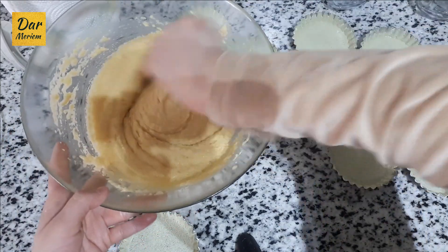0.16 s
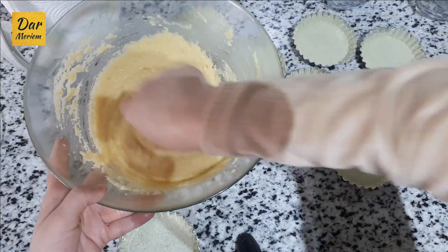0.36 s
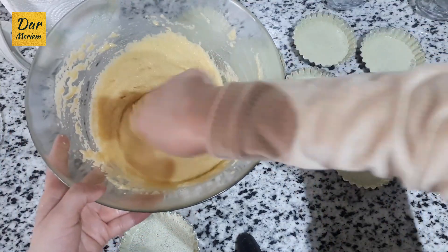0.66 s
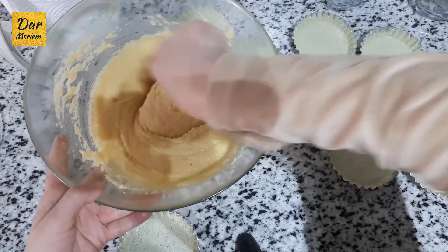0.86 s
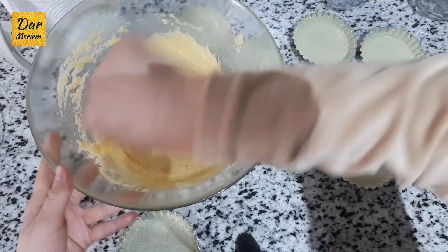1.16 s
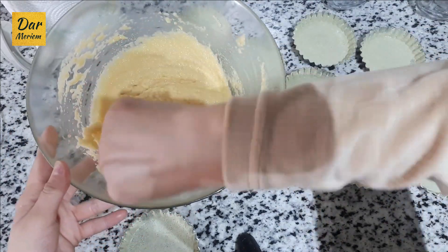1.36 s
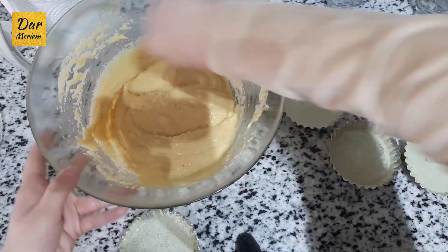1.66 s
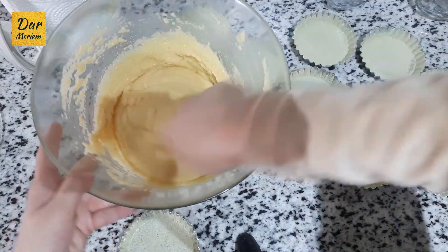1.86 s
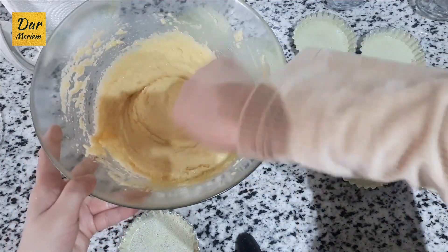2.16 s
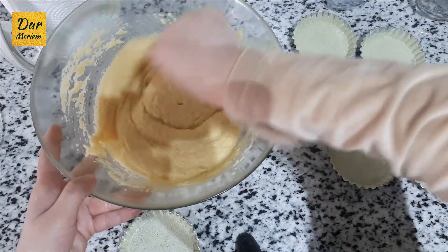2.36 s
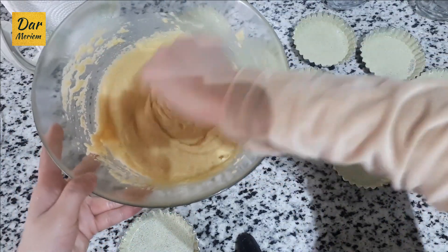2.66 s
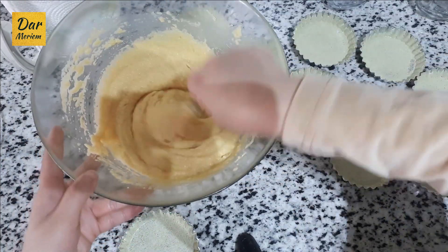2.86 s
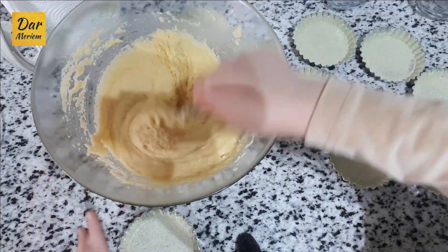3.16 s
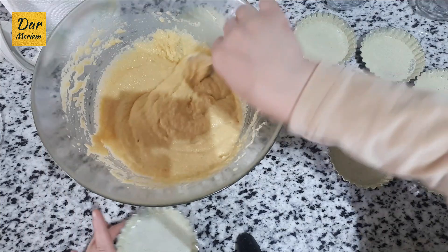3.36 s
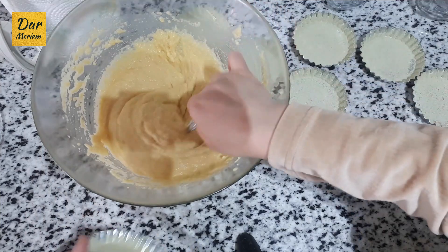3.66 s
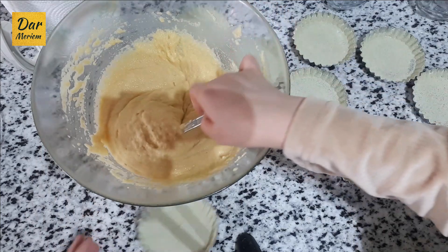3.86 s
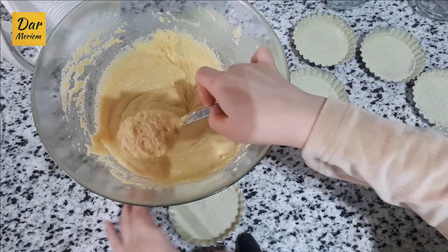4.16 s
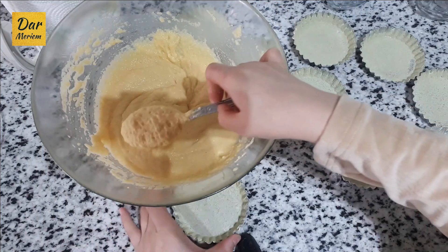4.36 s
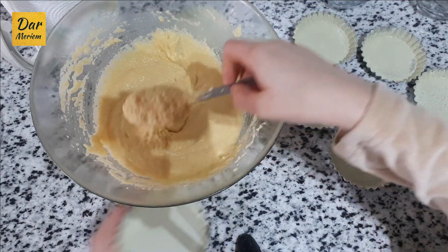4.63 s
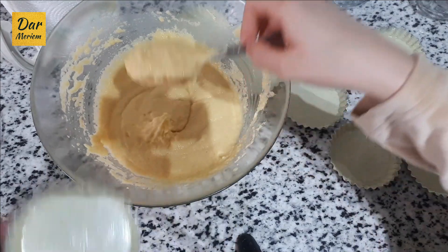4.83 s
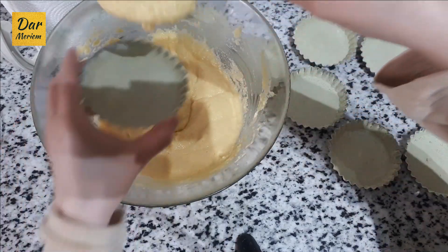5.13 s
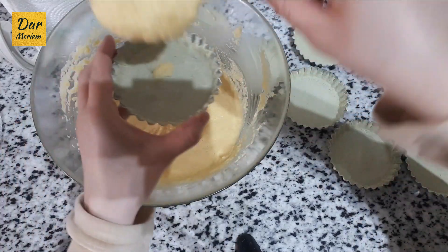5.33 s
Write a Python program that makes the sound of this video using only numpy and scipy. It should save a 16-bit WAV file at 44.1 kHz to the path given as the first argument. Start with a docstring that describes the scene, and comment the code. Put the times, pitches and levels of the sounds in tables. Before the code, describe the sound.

Two microphones above the bowl, leaning left, catch wet batter strokes with bursting bubbles, rustle and low glassy resonance. The stirring thins out by three seconds, faint metallic ticks follow, then a small tin scrapes in several quick rough strokes on stone with clear metal ring and a dull landing thud. Quiet sticky rustling closes it, over faint room air and short diffuse kitchen echoes.

```python
"""A spoon stirs thick batter in a glass bowl: grains of crackle ring around moving pitches as squelch
and rustle, swelling tones and short snaps are bursting air pockets, rising tones are gulps.
Then a small fluted metal tin is touched, dragged to and fro on the stone counter and lifted: clicks and
stone grain drive its modes. Two microphone ports hang above the bowl, the left one nearer.
The hard-walled kitchen answers bowl and tin with diffuse echoes, over a faint steady air noise."""
import sys
import numpy as np
from scipy import signal
from scipy.fft import rfft, irfft
from scipy.io import wavfile
from scipy.ndimage import uniform_filter1d, map_coordinates

SR = 44100
rng = np.random.default_rng(int(sys.argv[2]) if len(sys.argv) > 2 else 0)


def file_out(sig):
    """Save sig as 16-bit WAV at sys.argv[1]."""
    # one column per channel
    cols = np.atleast_2d(sig).T
    # limit, then scale
    lim = np.clip(cols, -1, 1)
    pcm = np.round(lim * 32767).astype(np.int16)
    wavfile.write(sys.argv[1], SR, pcm)


N = 242285


def from_db(db):
    """Decibels to amplitude."""
    return 10 ** (np.asarray(db) / 20)


def rms_one(x):
    """Scale to an rms of 1."""
    return x / np.sqrt(np.mean(x ** 2) + 1e-20)


def in_time(rows):
    """Columns of a table as curves, one value a sample."""
    s, *columns = np.transpose(rows)
    return [np.interp(np.arange(N) / SR, s, c) for c in columns]


def at_hz(points, hz):
    """Read a curve of (Hz, value) points, straight over log frequency."""
    points_hz, values = np.array(points).T
    return np.interp(np.log(np.maximum(hz, 1)), np.log(points_hz), values)


def colour(x, spectrum):
    """Causal (minimum-phase) filter with the given dB spectrum."""
    log_gain = np.log(from_db(at_hz(spectrum, np.fft.rfftfreq(2048, 1 / SR))))
    cepstrum = irfft(log_gain)
    cepstrum[1:1024] *= 2
    cepstrum[1025:] = 0
    kernel = irfft(np.exp(rfft(cepstrum)))[:1024]
    filtered = signal.fftconvolve(np.atleast_2d(x), kernel[None], axes=1)
    return filtered[:, :N].reshape(np.shape(x))


def resonate(x, hz, width_hz):
    """Two-pole resonance of gain 1 on top."""
    r = np.exp(-np.pi * width_hz / SR)
    poles = [1, -2 * r * np.cos(2 * np.pi * hz / SR), r * r]
    return signal.lfilter([(1 - r * r) / 2, 0, (r * r - 1) / 2], poles, x)


def grains(per_s, spread_db):
    """Random clicks of uneven size and either sign, rms 1."""
    sizes = from_db(spread_db * np.minimum(rng.exponential(1, N), 4)) * rng.choice([-1, 1], N)
    return rms_one(sizes * (rng.random(N) < per_s / SR))


def around(centre_hz, pitches, spread, sharpness, per_s):
    """Grains ring in a row of resonances; those near the moving centre speak most. Level evened to 1."""
    rung = 0
    for hz in pitches:
        nearness = np.exp(-(np.log(hz / centre_hz) / spread) ** 2) + 0.05
        rung = rung + nearness * resonate(grains(per_s, spread_db=7.0), hz, hz / sharpness)
    return rung / np.sqrt(uniform_filter1d(rung ** 2, size=8000))


def swells(s, peak_db, rise, fall):
    """Sum of gains that climb to each peak and sink from it at steady dB a second."""
    t = np.arange(N) / SR
    rows = np.broadcast(s, peak_db, rise, fall)
    return sum(from_db(db + np.minimum(up * (t - at), down * (at - t))) for at, db, up, down in rows)


def ports(x, balance, lag_s):
    """One source (or one signal a port) as the two ports hear it: the balance in dB, the right one late."""
    left, right = np.broadcast_to(x, (2, N))
    half = np.array(balance) * [1, .5]
    late = map_coordinates(right, [np.arange(N) - lag_s * SR], order=3, mode="nearest")
    return np.array([colour(left, half), colour(late, half * [1, -1])])


# Tone of the room's air. Each row: frequency in Hz, gain in dB.
AIR_SPECTRUM = [(12, -42.5), (20, -12.5), (131, 5.5), (237, -23), (566, -8), (794, -21), (1110, -17.5),
                (1470, -23), (3140, -27), (3940, -25.5), (7730, -41.5), (15200, -36), (16500, -43)]
# How alike the air sounds at both ports. Each row: frequency in Hz, left-right likeness (1 is the same).
AIR_LIKENESS = [(40, 0.3), (200, 0.93), (700, 0.64), (2000, .5), (6000, .1)]
# How much nearer the left port is, for the bowl and the air. Each row: frequency in Hz, left minus right in dB.
BOWL_BALANCE = [(40, -1.5), (130, 7), (700, 8), (2500, 8), (5000, 5), (12000, 2.5)]


def air(mid_db=-62):
    """Faint steady noise of the room, alike in both ports in the bass."""
    mid, side = colour(rng.standard_normal((2, N)), AIR_SPECTRUM)
    unlike = []
    for hz, likeness in AIR_LIKENESS:
        likeness = np.clip(likeness, 0, .99)
        unlike.append((hz, 10 * np.log10((1 - likeness) / (1 + likeness))))
    side = colour(side, unlike)
    return from_db(mid_db) / np.std(mid) * ports(np.array([mid + side, mid - side]), BOWL_BALANCE, 0)


# The bowl's glass, damped by batter. Each row: mode in Hz, width in Hz, gain in dB re the sound inside.
BOWL = [(295, 23, 14.5), (577, 29, 5.5), (670, 19, -21)]


def glass(x):
    """The bowl rings on under whatever happens in it."""
    return x + sum(from_db(db) * resonate(x, hz, width_hz) for hz, width_hz, db in BOWL)


# Strokes of the spoon. Each row: time in seconds, squelch in dB, rustle in dB.
STIR = [(0.0, -38.5, -48), (0.08, -63.5, -64.5), (0.24, -59.5, -57.5), (0.32, -45.5, -58),
        (0.48, -59.5, -59), (0.78, -47.5, -56), (0.89, -56.5, -60), (1.0, -68.5, -126), (1.22, -76, -66),
        (1.33, -76, -64.5), (1.45, -79, -67.5), (1.57, -76, -63), (1.72, -73, -80), (1.81, -49.5, -52),
        (1.95, -51, -55.5), (2.09, -60, -64), (2.21, -48, -44.5), (2.3, -44.5, -86), (2.38, -65.5, -43.5),
        (2.5, -48, -59), (2.67, -59.5, -68), (2.9, -69.5, -73), (3.1, -61.5, -52), (3.19, -66, -61),
        (3.3, -65, -55), (3.42, -68, -56.5), (3.67, -80.5, -69.5)]
# Spoon and tin are lifted. Each row: time in seconds, squelch in dB, rustle in dB.
LIFT = [(4.5, -68, -78), (4.6, -87, -68), (4.669, -65, -63.5), (4.789, -61, -63.5), (4.92, -75, -65.5),
        (5.0, -60.5, -52.5), (5.11, -82, -72.5), (5.19, -91, -66), (5.33, -81.5, -77), (5.49, -100, -84)]
# Where the rustle is brightest. Each row: time in seconds, frequency in Hz.
RUSTLE_PITCH = [(0, 2860), (0.8, 3620), (1.0, 2850), (1.3, 4360), (1.8, 2500), (2.3, 3520), (2.6, 2800),
                (2.75, 4630), (3.1, 2750), (3.2, 4600), (3.45, 2130), (4.6, 2200), (4.68, 3940),
                (4.78, 2730), (4.92, 4065), (5.0, 2590), (5.1, 2100), (5.2, 3820), (5.49, 3375)]
# Tone of the rustle. Each row: frequency in Hz, filter gain in dB.
RUSTLE = [(800, -30), (1500, 4.5), (2300, -11), (4500, 0), (6300, -4.5), (7300, -30.5), (9000, -57.5)]
# Finest treble, of hiss, fizz and fine grit. Each row: frequency in Hz, filter gain in dB.
TOP = [(6000, -42), (8800, -19.5), (10500, -8.5), (12500, -5), (15000, -8), (16500, -10)]

SQUELCH_HZ, SQUELCH_DB_PER_OCTAVE = 694, 33   # pitch at -60 dB; a harder stroke squelches higher
HISS_DB, HISS_FOLLOWS = -78, 0.45   # fine treble hiss at a rustle of -60 dB; share of its swing
RUMBLE_DB, RUMBLE_FOLLOWS = -64, .6   # rumble at a squelch of -60 dB; share of its swing


def stirring():
    """Tiny pockets crackle around a moving pitch; batter rustles under a fine treble hiss; the bowl rumbles."""
    rests = [[3.7, -95, -90], [4.4, -95, -90]]
    squelch_db, rustle_db = in_time(np.concatenate([STIR, rests, LIFT]))
    squelch_hz = np.clip(SQUELCH_HZ * 2 ** ((squelch_db + 60) / SQUELCH_DB_PER_OCTAVE), 480, 1200)
    squelch = around(squelch_hz, np.geomspace(350, 1500, 12), spread=0.59, sharpness=10.0, per_s=300)
    rustle_hz, = in_time(RUSTLE_PITCH)
    rustle = around(rustle_hz, np.geomspace(1500, 6500, 12), spread=.38, sharpness=8, per_s=1100)
    rustle = colour(rustle, RUSTLE)
    hiss = rms_one(colour(rng.standard_normal((2, N)), TOP))
    rumble = rng.standard_normal(N)   # the bowl on the stone
    rumble = rms_one(resonate(rumble, 170, width_hz=51) + 0.49 * resonate(rumble, 250, width_hz=33))
    hiss_db = HISS_DB + HISS_FOLLOWS * (rustle_db + 60)
    rumble_db = RUMBLE_DB + RUMBLE_FOLLOWS * (squelch_db + 60)
    return (glass(from_db(squelch_db) * squelch) + from_db(rustle_db) * rustle
            + from_db(hiss_db) * hiss + from_db(rumble_db) * rumble)


# How long the kitchen rings. Each row: frequency in Hz, seconds to die by 60 dB.
ROOM_T60 = [(100, 0.28), (260, 0.43), (700, 0.26), (1840, 0.31), (4850, 0.28), (12800, 0.23)]
# How alike the echoes are at both ports. Each row: frequency in Hz, left-right likeness (1 is the same).
ECHO_LIKENESS = [(80, 0.56), (300, 0.62), (800, 0.22), (1500, 0.097), (5000, 0.017)]


def kitchen(x, first_s=0.0015):
    """Diffuse echoes dying band by band, alike in both ports in the bass, unlike in the treble."""
    t = np.arange(round(.6 * SR)) / SR
    edges = 60 * 2 ** np.arange(0, 8.6, .5)   # half-octave bands
    white = rng.standard_normal((2, 2, len(t)))   # neighbouring bands take turns
    tail = 0
    for k, (low, high) in enumerate(zip(edges, edges[1:])):
        band = signal.butter(2, [low, high], "band", fs=SR, output="sos")
        mid, side = signal.sosfilt(band, white[k % 2])
        hz = np.sqrt(low * high)
        alike = np.clip(at_hz(ECHO_LIKENESS, hz), -1, 1)
        pair = np.sqrt(1 + alike) * mid + np.sqrt(1 - alike) * side * [[1], [-1]]
        tail = tail + pair * from_db(-60 * t / at_hz(ROOM_T60, hz))
    tail = tail * np.clip(t / first_s - .5, 0, 1)
    tail = tail / np.sqrt(np.sum(tail ** 2, axis=1, keepdims=True))
    return signal.fftconvolve(x, tail, axes=1)[:, :N]


# Air pockets bursting. Each row: start in seconds, pop level in dB, pocket pitch in Hz,
# snap in dB re the pop, snap pitch in Hz, fizz in dB re the pop.
POPS = [(0.003, -29, 910, -6.5, 3030, -11), (0.146, -52.5, 600, 12.5, 3230, -22),
        (0.243, -44, 590, -5, 2790, -31), (0.295, -48, 640, 5.5, 2780, -31),
        (0.31, -35, 724, 5.5, 1980, -4.5), (0.342, -17, 910, -5.5, 1800, -45),
        (0.488, -48.5, 570, 5, 3000, -16), (0.594, -25.5, 675, 6, 2870, -6.5),
        (0.66, -29.5, 700, -7, 1990, -17), (0.698, -6.5, 794, -4.5, 3860, -9),
        (0.897, -35.5, 930, -9.5, 5130, -27), (0.912, -38, 735, -9.5, 4900, -24),
        (1.23, -42.5, 927, -3.5, 1830, -8), (1.296, -56, 514, 15.5, 4590, -11),
        (1.761, -41.5, 1050, 2, 1610, -19), (1.823, -36.5, 910, 8, 1920, 1.5),
        (2.115, -46.5, 604, 6.5, 1920, -41), (2.177, -13, 735, 6.5, 2370, -7.5),
        (2.276, -17.5, 890, 10.5, 3840, 3.5), (2.458, -37.5, 1050, 2, 2230, -22),
        (2.48, -34, 644, -4, 1620, -6), (2.543, -20.5, 945, -7, 1890, -24),
        (2.589, -37, 945, -6.5, 2900, -31), (2.76, -34.5, 684, -1, 1780, -12),
        (2.783, -48, 605, 5, 5100, -26), (2.935, -53.5, 573, 6.5, 4700, -29),
        (3, -41.5, 1080, -1.5, 2000, -17), (3.01, -26, 864, -4.5, 3430, -11.5),
        (3.049, -53.5, 774, 21, 2620, -24)]
# Tone of the snaps. Each row: frequency in Hz, filter gain in dB.
SNAP = [(700, -34.5), (1200, -3.5), (3000, 4.5), (6300, 2), (6900, -8), (7600, -15), (9000, -48.5)]

SWELL_CYCLES = 1.106   # a pocket swells for this many of its cycles
SNAP_WIDTH_HZ = 393
OVERTONE_RATIO, OVERTONE_DB, SKIN_DB = 1.6, -5, -10   # second and third resonance of a snap, re the first
CRACK_DB, CRACK_S = -3, 0.0039   # toneless part of a snap, re its first resonance; its decay time
THUMP_DB, THUMP_FOLLOWS = -41.5, 0.57   # thump under a pop of -30 dB; share of the pop's level it follows


def pops(skin_hz=5800, skin_width_hz=1400, fizz_s=0.002, thump_hz=140, thump_s=0.0053):
    """A pocket rings a few cycles, its skin snaps in three short resonances and fizzes, the bowl thumps."""
    length = 4000
    t = np.arange(length) / SR
    low, snap, top = np.zeros(N + length), np.zeros(N + length), np.zeros((2, N + length))
    cracks = rng.standard_normal((len(POPS), 2, length))
    thump = np.sin(2 * np.pi * thump_hz * t) * t / thump_s * np.exp(1 - t / thump_s)
    skin = from_db(SKIN_DB) * np.sin(2 * np.pi * skin_hz * t) * np.exp(-np.pi * skin_width_hz * t)
    for (s, peak_db, hz, snap_db, snap_hz, fizz_db), crack in zip(POPS, cracks):
        here = slice(round(s * SR), round(s * SR) + length)
        swell = t * hz / SWELL_CYCLES * np.exp(1 - t * hz / SWELL_CYCLES)
        low[here] += from_db(peak_db) * swell ** 2 * np.sin(2 * np.pi * hz * t)
        low[here] += from_db(THUMP_DB + THUMP_FOLLOWS * (peak_db + 30)) * thump
        overtone = from_db(OVERTONE_DB) * np.sin(2 * np.pi * OVERTONE_RATIO * snap_hz * t)
        rings = (np.sin(2 * np.pi * snap_hz * t) + overtone) * np.exp(-np.pi * SNAP_WIDTH_HZ * t)
        toneless = from_db(CRACK_DB) * crack[0] * np.exp(-t / CRACK_S)
        snap[here] += from_db(peak_db + snap_db) * (rings + skin + toneless)
        top[:, here] += from_db(peak_db + fizz_db) * crack * np.exp(-t / fizz_s)
    return glass(low[:N]) + colour(snap[:N], SNAP) + colour(top[:, :N], TOP)


# Batter folds over trapped air, the pocket shrinks. Each row: start in seconds, length in seconds,
# level in dB, start pitch in Hz, pitch in Hz after that length.
GULPS = [(0.344, 0.046, -39.5, 940, 1140), (1.883, 0.049, -34.5, 840, 971.5),
         (2.543, 0.039, -46.5, 889, 1044)]


def gulps(rough_hz=45):
    """A shrinking pocket gives a rising, fluttering tone under a soft swell."""
    out = np.zeros(N)
    noise = rng.standard_normal((len(GULPS), 2, 6000))
    flutters = signal.lfilter([1], [1, -np.exp(-2 * np.pi * rough_hz / SR)], noise)
    for (s, length_s, level_db, start_hz, end_hz), (a, b) in zip(GULPS, flutters):
        u = np.arange(6000) / SR / length_s
        hz = start_hz + (end_hz - start_hz) * np.minimum(u, 1.3)
        phase = 2 * np.pi * np.cumsum(hz) / SR
        tone = rms_one(a) * np.sin(phase) + rms_one(b) * np.cos(phase)
        swell = 3 * u * np.exp(1 - 3 * u)
        at = round(s * SR)
        out[at:at + 6000] += from_db(level_db) * swell * tone
    return out


# The tin's rim on stone or finger. Each row: time in seconds, relative level in dB,
# then in Hz the two modes that the contact favours.
TAPS = [(3.28, -26.5, 1660, 3810), (3.360, -34.5, 3706, 3706), (3.390, -44, 1425, 1420),
        (3.424, -35.5, 2103, 2860), (3.448, -35, 1110, 2815), (3.683, -24, 1120, 2820),
        (3.7, -12, 2810, 3785), (3.832, -3.5, 2123, 2096), (4.109, -8, 5030, 6200), (4.221, -7, 1950, 3740),
        (4.240, -13, 2190, 2910), (4.435, -30.5, 1900, 2850), (4.458, -26, 2095, 2170),
        (4.471, -39, 2120, 2850), (5.341, -51.5, 3860, 5035)]
# Slides of the tin on stone. Each row: time of fastest motion in seconds, friction in relative dB,
# its rise in dB per second, its fall in dB per second, fine grit in relative dB.
SLIDES = [(3.431, -46.5, 2997, 200, -75), (3.685, -46.5, 6000, 301, -30.5), (3.704, -27, 1397, 152, -49.5),
          (3.856, -12.5, 221, 157, -22), (3.996, -13, 561.5, 175.5, -20), (4.138, -13, 298.5, 312, -24),
          (4.251, -15, 139.5, 442, -27), (4.478, -45.5, 125.5, 275, -71)]
# The tin's modes. Each row: frequency in Hz, width in Hz while pressed or gripped, level in relative dB.
TIN = [(685, 46, -20), (877, 18, -22), (1110, 45, -21), (1420, 40, -26), (1660, 60, -24), (1900, 50, -16),
       (2050, 25, -10), (2120, 38, 0), (2243, 35, -14), (2446, 27, -17), (2790, 25, -16), (2850, 32, -10),
       (2905, 35, -14), (3706, 32, -17), (3860, 50, -16), (4140, 50, -27), (4730, 44, -25), (5035, 60, -19),
       (5510, 40, -31), (6310, 80, -23), (6500, 40, -27)]
# Tone of the grit. Each row: frequency in Hz, filter gain in dB.
GRIT = [(400, -36.5), (800, -10.5), (1500, -2.5), (2200, -4.5), (2900, 0), (3350, -8.5), (3800, -7.5),
        (4400, -7.5), (5000, 0), (5600, -8.5), (6400, -6), (7500, -29.5), (9000, -40.5)]
# The counter under the slides. Each row: frequency in Hz, width in Hz, relative level in dB.
COUNTER = [(165, 5.5, 11.5), (318, 720, -10.5), (715, 550, -16.5)]
# The modes, in Hz, that ring on longest while the tin is only touched.
LONG_RINGING_HZ = (1110, 2850)

LET_GO_S, PRESSED_S, EASED_S, GRIPPED_S = 3.41, 3.67, 4.4, 4.7   # fingers off; stone from, to; hand from
LIFTED_DAMPING, LONG_DAMPING = .6, .2   # share of the mode widths left while only touched; of the longest
CHATTER_DB, CHATTER_HZ = 2.2, 70   # the base sticks and slips: spread and speed of the friction's flutter
BODY_DB, GRIT_DB, COUNTER_DB = 20.5, 3.5, -32   # drive of the modes, grit and counter, re friction
GRIT_STEEPNESS = 1.74   # grit rises and falls faster than friction
COUNTER_FOLLOWS = 0.67   # share of the friction's dB that the counter follows
FINE_RISE_DB_PER_S, FINE_FALL_DB_PER_S = 901, 352   # fine grit speaks only near full speed; rise is a minimum
OWN_GRAIN = .45   # noise in the drive that differs from mode to mode, re the shared grain


def tin():
    """Stone grain under the base and the rim's taps drive the tin's modes; grit and counter sound too."""
    fastest_s, friction_db, rise, fall, fine_db = np.transpose(SLIDES)
    r = np.exp(-2 * np.pi * CHATTER_HZ / SR)
    flutter = rms_one(signal.lfilter([1], [1, -2 * r, r * r], rng.standard_normal(N)))
    chatter = from_db(CHATTER_DB * flutter)
    friction = swells(fastest_s, friction_db, rise, fall) * chatter
    fine_gain = swells(fastest_s, fine_db, np.maximum(rise, FINE_RISE_DB_PER_S), FINE_FALL_DB_PER_S)
    rub = grains(3000, spread_db=2.5)

    s, peak_db, *favoured_hz = np.transpose(TAPS)
    at = (s * SR).astype(int)
    taps = np.zeros(N)
    taps[at] = from_db(peak_db)
    strengths = from_db(rng.normal(0, 2.5, (len(TAPS), len(TIN))))

    n = np.arange(N)
    damped = (n > PRESSED_S * SR) & (n < EASED_S * SR)   # stone damps the tin
    damped |= (n < LET_GO_S * SR) | (n > GRIPPED_S * SR)   # so does a hand that holds it
    body = np.zeros(N)
    for k, (hz, width_hz, level_db) in enumerate(TIN):
        closeness = np.exp(-(np.log(hz / np.array(favoured_hz)) / .03) ** 2).max(axis=0)
        favour = .3 + from_db(-3 - level_db) * closeness   # favoured modes all ring near full strength
        # each mode sees the grain a little differently
        drive = from_db(BODY_DB) * friction * (rub + OWN_GRAIN * rng.standard_normal(N))
        drive[at] += from_db(38.0) * taps[at] * strengths[:, k] * favour
        left = LONG_DAMPING if hz in LONG_RINGING_HZ else LIFTED_DAMPING
        held = resonate(drive * damped, hz, width_hz)
        touched = resonate(drive * ~damped, hz, width_hz * left) / np.sqrt(left)
        body += (-1) ** k * from_db(level_db) * (held + touched)

    grit_gain = swells(fastest_s, friction_db + GRIT_DB, GRIT_STEEPNESS * rise, GRIT_STEEPNESS * fall)
    grit = colour(grit_gain * chatter * rub + from_db(19) * taps, GRIT)
    fine_grains = np.array([grains(6000, spread_db=4.5), rub])   # left port, right port
    fine = colour(fine_gain * fine_grains + from_db(-16) * taps, TOP)
    counter = rms_one(sum(from_db(db) * resonate(rub, hz, width_hz) for hz, width_hz, db in COUNTER))
    return body + grit + fine + from_db(COUNTER_DB) * friction ** COUNTER_FOLLOWS * counter + thuds()


# The tin's base lands on the counter. Each row: start in seconds, level in dB, pitch in Hz.
THUDS = [(3.696, -23.5, 165), (4.27, -9, 293)]


def thuds(width_hz=130):
    """The counter answers a landing with one dull, short note."""
    out = np.zeros(N)
    for s, peak_db, hz in THUDS:
        at = round(s * SR)
        t = np.arange(N - at) / SR
        onset = (1 - np.exp(-t / 0.002)) ** 2
        out[at:] += from_db(peak_db) * np.sin(2 * np.pi * hz * t) * np.exp(-np.pi * width_hz * t) * onset
    return out


# How the tin leans to the left port. Each row: frequency in Hz, left minus right in dB.
TIN_BALANCE = [(130, 7), (700, 6), (2100, 6), (4000, 1), (8000, 3), (12000, 5)]

BOWL_LAG_S, TIN_LAG_S = .00013, .00008   # the right port hears later


def scene():
    """Bowl and tin, direct and through the kitchen, over the air noise."""
    bowl = ports(pops() + gulps() + stirring(), BOWL_BALANCE, BOWL_LAG_S)
    metal = ports(tin(), TIN_BALANCE, TIN_LAG_S)
    echoes = kitchen(from_db(-1.0) * bowl + from_db(-1.5) * metal)
    return bowl + metal + echoes + air()


def record(dry):
    """Peaks are rounded, the top is cut."""
    rounded = .95 * np.tanh(dry / .95)
    top_cut = signal.cheby2(12, 70, 16700, fs=SR, output="sos")   # 70 dB down from 16700 Hz
    return signal.sosfilt(top_cut, rounded)


dry = scene()
out = record(dry)
file_out(out)
```